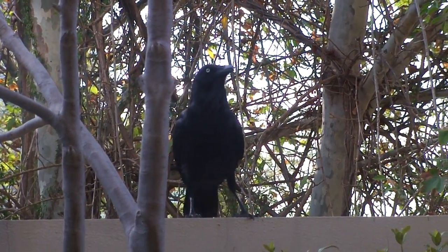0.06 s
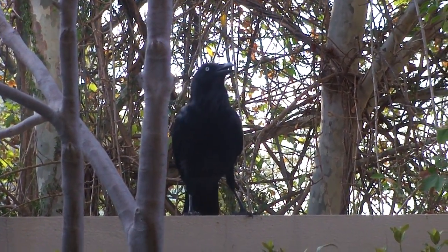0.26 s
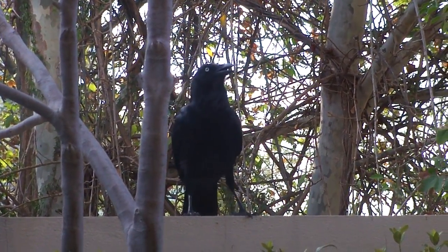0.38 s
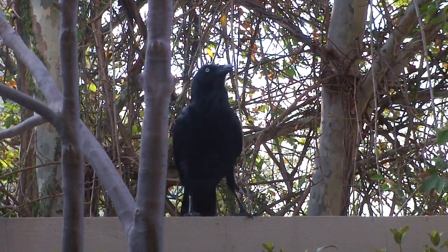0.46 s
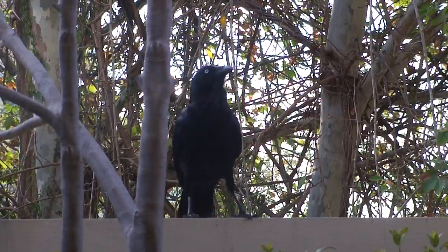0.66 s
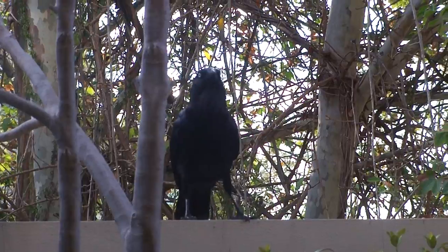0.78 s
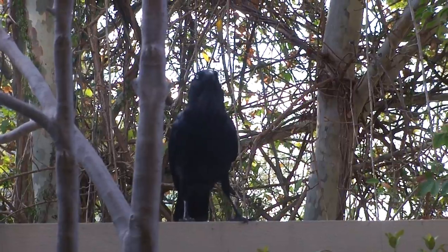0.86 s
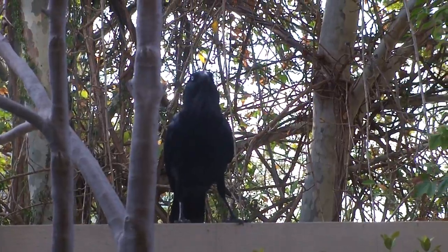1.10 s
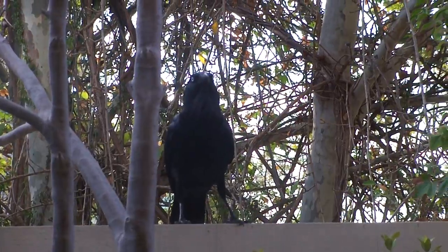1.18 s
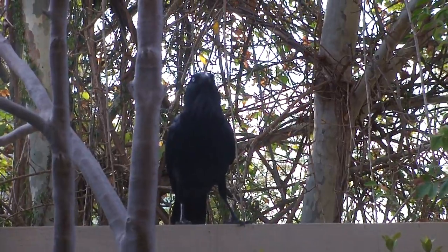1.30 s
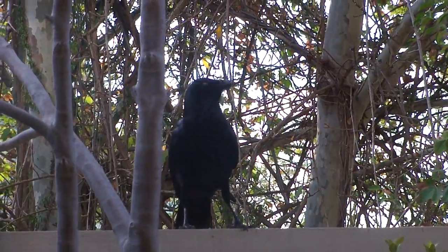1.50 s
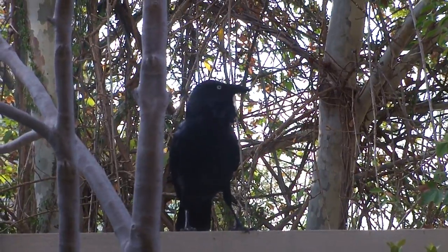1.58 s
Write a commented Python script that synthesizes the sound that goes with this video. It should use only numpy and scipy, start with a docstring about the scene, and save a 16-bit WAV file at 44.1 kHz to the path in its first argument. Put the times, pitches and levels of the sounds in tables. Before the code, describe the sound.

One close, raspy raven caw in a garden with soft background noise.

```python
"""A garden in stereo, the microphone close to a raven on the fence.
A steady distant rush and the faint hum of a machine are there from the start.
At 0.16 s the raven gives one harsh caw, a little to the right: its syrinx snaps in a train of pulses
that rises in pitch, holds and sags, ringing the throat and open beak. The yard answers with a short echo.
Near 1.45 s a small bird, far off in the trees, adds a very faint rising whistle."""
import sys
import numpy as np
from scipy import signal
from scipy.fft import rfft, irfft, next_fast_len
from scipy.io import wavfile
from scipy.ndimage import map_coordinates

SR = 44100
rng = np.random.default_rng(int(sys.argv[2]) if len(sys.argv) > 2 else 0)


def transcribe(u):
    """Save the signal u as a 16-bit wav file named by the first command-line argument.

    u: samples, shape (n,) or (channels, n), limited to [-1, 1]; the rate is SR.
    q: integer samples, one column per channel.
    """
    v = np.clip(np.atleast_2d(u).T, -1, 1)
    q = np.round(v * 32767).astype(np.int16)
    wavfile.write(sys.argv[1], SR, q)


N = 72765

# pulse rate of the syrinx: time_s, pitch_hz
CAW_PITCH = [(.17, 184.2), (.195, 204.3), (.208, 222.8), (.226, 217.5), (.237, 242.6), (.255, 233),
             (.272, 245.9), (.30, 243.6), (.365, 244.9), (.40, 235.6), (.425, 224.4), (.445, 211.7),
             (.457, 192.3), (.475, 183.5)]
# the push behind the caw: time_s, level_db, roughness (0-1)
CAW_EFFORT = [(.16, -36.5, 0.54), (.21, -19.5, .12), (.25, -14.5, 0.29), (.275, -14.5, 0.2),
              (.325, -13.5, 0), (.395, -14.5, 0.01), (.412, -18, 0.33), (.44, -20, 0.26),
              (.468, -16.5, 0.48), (.495, -37.5, 0.5)]
# resonances of throat and open beak: frequency_hz, gain_db
THROAT = [(120, -51), (244, -41), (490, -24.5), (600, -22), (700, -17.5), (850, -24), (970, -11),
          (1050, -10), (1110, 2), (1210, 0), (1320, -11), (1470, -11.5), (1700, -15), (1950, -12),
          (2200, -24), (2450, -27), (2700, -35), (2900, -48.5), (3280, -34), (3420, -23), (3560, -31),
          (3800, -52), (4700, -41), (5400, -43.5), (5850, -24.5), (6300, -36), (7000, -31), (8300, -26),
          (10000, -32), (11300, -42), (15000, -49.5)]
# how the caw and its echo lean at the microphone: frequency_hz, right_over_left_db
CAW_LEAN = [(700, 0.5), (1200, 0.8), (1600, 0), (2100, 2.5), (3500, 2), (6000, 0.7), (9000, 0.3),
            (14000, 0.5)]
# decay of the yard's tail: frequency_hz, t60_s
YARD_DECAY = [(300, 1.6), (1200, 0.7246), (2000, 0.7242), (3500, 0.66), (6000, 0.5147), (9000, 0.48),
              (15000, 0.5)]
# strength of that tail: frequency_hz, gain_db
YARD_GAIN = [(300, -14), (700, -7.5), (1200, -3.5), (2000, 3), (3500, -4.5), (6000, 6), (10000, -5)]
# left against right in the echo: frequency_hz, likeness (0-1)
YARD_LIKENESS = [(100, 0.95), (1200, 0.95), (2200, 0.79), (6000, 0.72), (12000, 0.36)]
# the far bird's whistle: time_s, pitch_hz, level_db
WHISTLE = [(1.42, 4150, -105), (1.47, 4280, -80), (1.53, 4370, -75), (1.62, 4450, -80)]
# colour of the distant rush: frequency_hz, relative_density_db
RUSH_SPECTRUM = [(25, -56), (60, -22.5), (120, -12.5), (200, -3), (450, -2.5), (700, -.5), (1250, -3.5),
                 (1900, -9), (2400, -20), (2900, -37.5), (3500, -38.5), (4800, -45), (5800, -31),
                 (8000, -31.5), (10000, -38), (11200, -48.5), (15000, -47)]
# left against right in the rush: frequency_hz, likeness (0-1)
RUSH_LIKENESS = [(100, .98), (300, .98), (650, .94), (1400, .83), (3100, .56), (6800, .25), (12000, .12)]
# drift of the rush's treble: time_s, gain_db
RUSH_TREBLE = [(.1, -1), (.8, 1), (1.4, 0.3), (1.56, 4)]
# partials of the distant machine: pitch_hz, level_db
HUM_PARTIALS = [(100, -64.5), (150.5, -59), (251, -55.5), (300.5, -53), (400, -43.5)]
# the recorder's narrow dips: centre_hz, width_hz, depth_db
NOTCHES = [(3010, 75, 26), (4000, 130, 28), (5010, 70, 24), (12800, 850, 48)]


def raven(onset_s=0.16, end_s=0.514, fade_s=0.025, rasp_hz=1893, rasp_width_hz=340, rasp_db=12.5):
    """Close up: the syrinx rings throat and beak, rough at both ends, clear and bright in the middle."""
    t = np.arange(N) / SR
    pitch, = curves(CAW_PITCH)
    level_db, rough = curves(CAW_EFFORT)
    cycles = np.cumsum(pitch * (1 + 0.0023 * wobble(69.87))) / SR  # slightly unsteady pitch
    source = syrinx(cycles, level_db, rough)
    # the throat locks onto the fifth harmonic while the voice is clear
    clarity = np.clip(1 - rough / 0.34, 0, 1)
    overtone = amp(-23.5) * clarity * np.cos(2 * np.pi * 5 * cycles)
    # the second resonance swells as the voice turns rough
    damping = lambda hz: 1j * hz * rasp_width_hz
    rasp = filtered(source * rough, lambda hz: damping(hz) / (rasp_hz ** 2 - hz ** 2 + damping(hz)))
    push = amp(level_db) * np.clip(np.minimum(t - onset_s, end_s - t) / fade_s, 0, 1)
    drive = push * (source + overtone + amp(rasp_db) * rasp)
    voice = filtered(drive, lambda hz: causal(along(THROAT, hz)))
    return unit(voice) * np.sqrt(np.mean(push ** 2))


def syrinx(cycles, level_db, rough, jitter_s=.00007, shimmer_db=12, air_db=-4, hiss_db=-7):
    """One snap and one puff of turbulence a cycle; roughness scatters the snaps in time and size."""
    t = np.arange(N) / SR
    times = np.interp(np.arange(1, int(cycles[-1])), cycles, t)
    time_scatter, size_scatter = rng.standard_normal((len(times), 2)).T * np.interp(times, t, rough)
    snaps = unit(pulses(times + jitter_s * time_scatter, amp(shimmer_db * size_scatter)))
    puff = unit(np.exp(-0.93 * (cycles % 1)))  # turbulence dies away within each cycle
    hiss = amp(hiss_db) * treble(rng.standard_normal(N), corner_hz=5000)
    air = amp(air_db) * rough * rng.standard_normal(N)
    source = snaps + puff * (air + hiss)
    # a weak push closes the syrinx softly and loses treble
    edge = treble(source, corner_hz=4000)
    return source - edge + amp(0.36 * (level_db - level_db.max())) * edge


def yard_echo(caw, count=24, tail_delay_s=0.0089, walls_s=.016, walls_db=-3.5, walls_hz=3000):
    """Near walls scatter mostly treble; a diffuse tail follows, its treble dying first."""
    hz, t, spectra = signal.stft(rng.standard_normal((2, N)), SR, nperseg=256)
    t60 = along(YARD_DECAY, hz)[:, None]
    decay = amp(along(YARD_GAIN, hz)[:, None] - 60 * t / t60)
    decay *= np.sqrt(2 * np.log(1000) / (t60 * SR))  # a longer decay adds no energy
    tail = signal.istft(spectra * decay, SR, nperseg=256)[1][:, :N]
    tail *= np.arange(N) / SR > tail_delay_s
    walls = np.zeros((2, N))
    for channel in walls:
        delays = walls_s * rng.uniform(0.0202, 1, count)
        channel += pulses(delays, rng.choice([-1, 1], count) / np.sqrt(count))
    walls = filtered(walls, lambda hz: amp(walls_db) * (1j * hz / (walls_hz + 1j * hz)) ** 2)
    return signal.fftconvolve(caw[None], spread(tail + walls, YARD_LIKENESS), axes=1)[:, :N]


def far_bird(blur_rad=1.7):
    """Far off: a thin rising whistle, its phase scattered by foliage."""
    pitch, level_db = curves(WHISTLE)
    phase = 2 * np.pi * np.cumsum(pitch) / SR + blur_rad * wobble(250)
    return np.sqrt(2) * amp(level_db) * np.sin(phase)


def distant_rush(level_db=-38):
    """A steady bed of diffuse noise whose treble drifts a little."""
    noise = spread(rng.standard_normal((2, N)), RUSH_LIKENESS)
    rush = unit(filtered(noise, lambda hz: amp(along(RUSH_SPECTRUM, hz))))
    fizz = treble(rush, corner_hz=3000, order=4)
    fizz_db, = curves(RUSH_TREBLE)
    return amp(level_db) * (rush - fizz + amp(fizz_db) * fizz)


def machine_hum():
    """A distant machine, each partial wavering slightly in level and phase."""
    t = np.arange(N) / SR
    hum = np.zeros(N)
    for hz, level_db in HUM_PARTIALS:
        peak = np.sqrt(2) * amp(level_db + 1.1 * wobble(4.76))
        hum += peak * np.sin(2 * np.pi * hz * t + .22 * wobble(3.4))
    return hum


def amp(db):
    """Decibels to gain."""
    return 10 ** (np.asarray(db) / 20)


def unit(x):
    """Scale to rms 1."""
    return x / np.sqrt(np.mean(x ** 2) + 1e-20)


def along(points, hz):
    """Read (frequency_hz, value) points on a log frequency axis."""
    knots_hz, values = np.transpose(points)
    return np.interp(np.log(hz + 1), np.log(knots_hz + 1), values)


def curves(rows):
    """One value per sample for each column after the time."""
    times, *columns = np.transpose(rows)
    return [np.interp(np.arange(N) / SR, times, column) for column in columns]


def wobble(rate):
    """A smooth random curve, rate knots a second."""
    return map_coordinates(rng.standard_normal(int(N * rate / SR) + 4), [np.arange(N) * rate / SR])


def filtered(x, response):
    """Pass x through a complex response of frequency."""
    size = 2 * next_fast_len(N)
    return irfft(rfft(x, size) * response(np.fft.rfftfreq(size, 1 / SR)), size)[..., :N]


def treble(x, corner_hz, order=2):
    """The part of x above a soft corner."""
    return filtered(x, lambda hz: hz ** order / (hz ** order + corner_hz ** order))


def causal(db):
    """The response with these gains that rings only after it is struck."""
    cepstrum = irfft(np.log(amp(db)))
    half = len(cepstrum) // 2
    folded = np.concatenate([cepstrum[:1], 2 * cepstrum[1:half], cepstrum[half:half + 1]])
    return np.exp(rfft(folded, len(cepstrum)))


def spread(pair, likeness):
    """Two unrelated signals become a diffuse left and right."""
    turn = lambda hz: np.arccos(np.clip(along(likeness, hz), -1, 1)) / 2
    mid, side = filtered(pair, lambda hz: np.array([np.cos(turn(hz)), np.sin(turn(hz))]))
    return np.array([mid + side, mid - side])


def lean(right_db):
    """Left and right gains, right_db apart."""
    return amp(np.array([[-1], [1]]) * right_db / 2)


def pulses(times, sizes, order=8):
    """Sharp pulses placed between samples."""
    at = times[:, None] * SR
    taps = np.floor(at).astype(int) + np.arange(1 - order, order + 1)
    shape = np.sinc(taps - at) * np.cos(np.pi * (taps - at) / (2 * order)) ** 2
    return np.bincount(np.clip(taps, 0, N - 1).ravel(), (sizes[:, None] * shape).ravel(), N)


def scene():
    """At the microphone: the caw and its echo, a little to the right, over the distant sounds."""
    caw = raven()
    foreground = filtered(caw + yard_echo(caw), lambda hz: lean(along(CAW_LEAN, hz)))
    background = (distant_rush() + machine_hum()) * lean(right_db=.8)
    return foreground + background + far_bird()


def record(dry):
    """The recorder cuts a few narrow bands and keeps nothing above its band limit."""
    top_hz = 15850
    dips_db = lambda hz: -sum(db * np.exp(-((hz - centre) / width) ** 2) for centre, width, db in NOTCHES)
    return filtered(dry, lambda hz: causal(dips_db(hz)) * (hz < top_hz))


dry = scene()
out = record(dry)
transcribe(out)
```